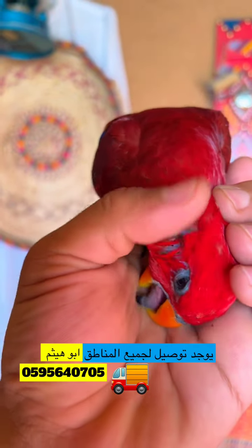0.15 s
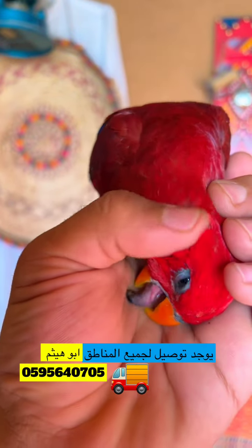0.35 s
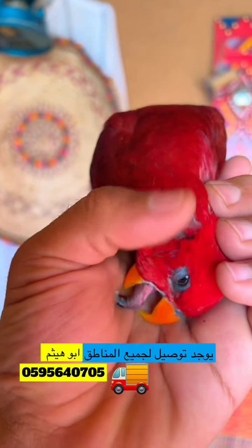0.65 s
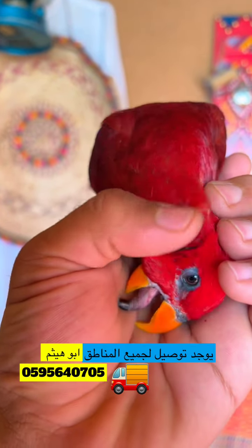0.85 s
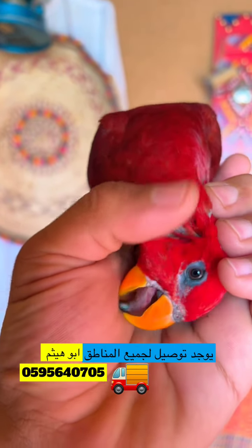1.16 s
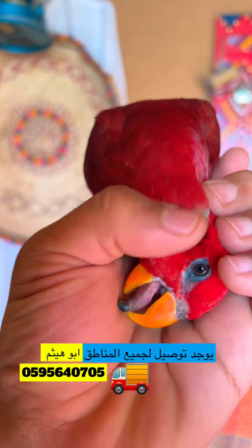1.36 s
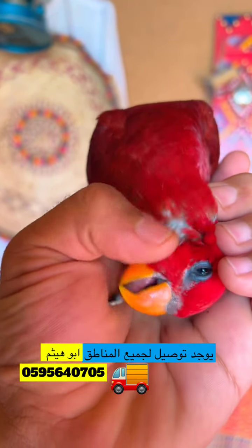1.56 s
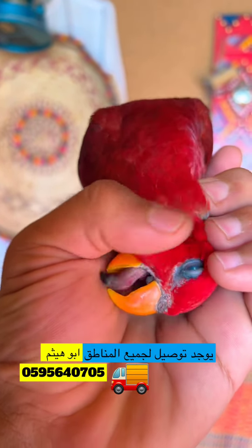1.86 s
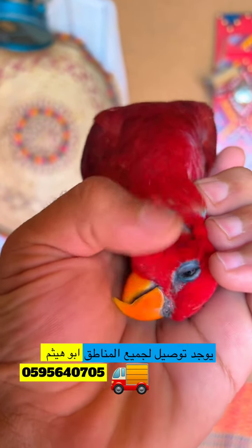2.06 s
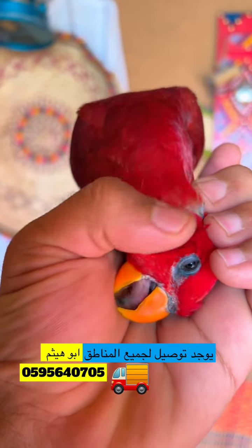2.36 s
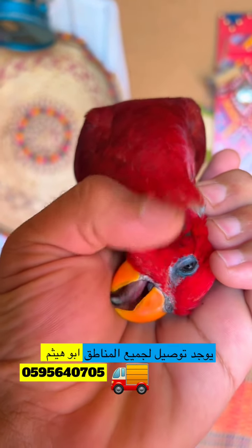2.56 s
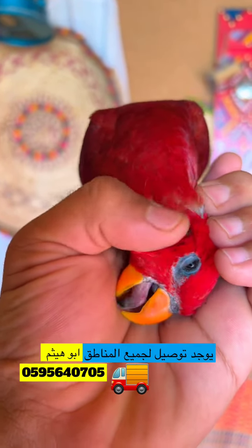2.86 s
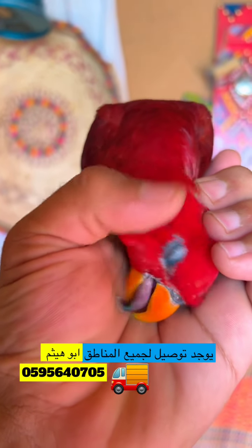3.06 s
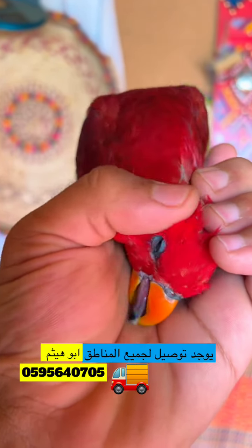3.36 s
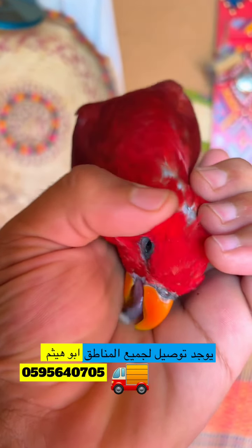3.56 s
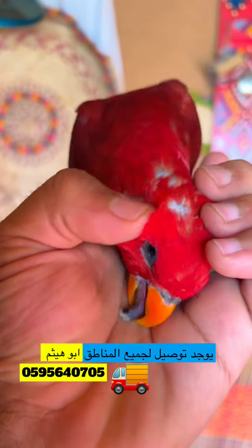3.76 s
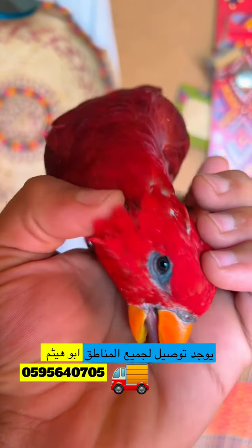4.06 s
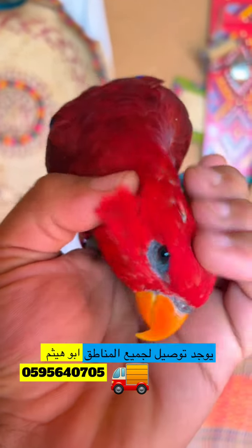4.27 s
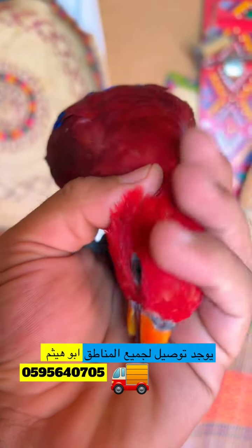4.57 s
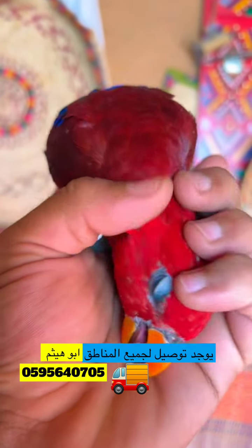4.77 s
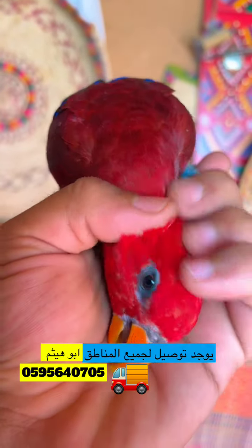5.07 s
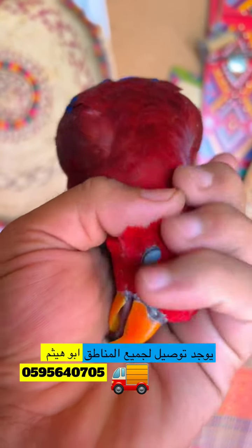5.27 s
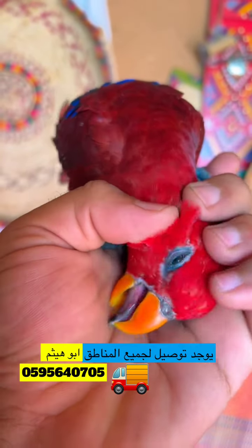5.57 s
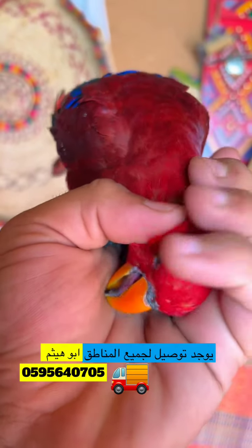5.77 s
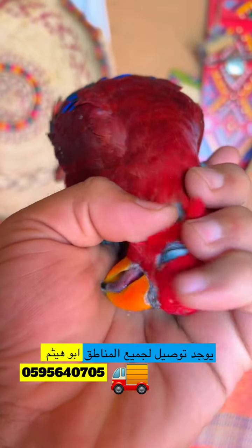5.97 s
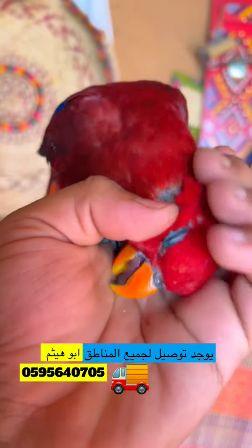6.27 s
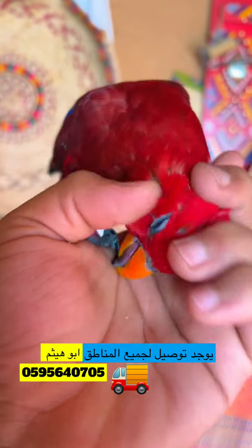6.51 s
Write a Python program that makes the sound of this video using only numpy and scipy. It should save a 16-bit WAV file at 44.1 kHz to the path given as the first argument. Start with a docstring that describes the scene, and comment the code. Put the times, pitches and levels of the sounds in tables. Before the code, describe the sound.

Close, raspy parrot squawks and drawn-out screeches burst out indoors, broken by small whimpers and a brief lull with tiny dry ticks.

```python
"""A small room with an appliance humming: a lory held in a hand squawks in quick runs, close to a phone.
Each squawk is one push of breath: the syrinx scoops up, mostly to about 2 kHz, then sags and splits
into subharmonics and rasp. Soft whimpers come between, and three drawn-out screams in the middle,
the first clearing to a high whistle. Low moans waver under the calls.
Fingers rub the feathers in short dull scuffs of noise, and four dry ticks fall in the late lull."""
import sys
import numpy as np
from scipy import signal
from scipy.fft import rfft, irfft
from scipy.io import wavfile
from scipy.ndimage import uniform_filter1d

SR = 44100
rng = np.random.default_rng(int(sys.argv[2]) if len(sys.argv) > 2 else 0)


def output_pcm(signal):
    """Save a mono or channel-first signal as 16-bit PCM at the path in sys.argv[1].

    Samples are clipped to [-1, 1] before scaling.
    """
    pcm = np.clip(np.atleast_2d(signal).T, -1, 1) * 32767
    wavfile.write(sys.argv[1], SR, np.round(pcm).astype(np.int16))


N = 292824
TIME = np.arange(N) / SR


def undb(db):
    """Decibels to gain."""
    return 10 ** (np.asarray(db) / 20)


def unit(x):
    """Scale to rms 1."""
    return x / np.sqrt(np.mean(x ** 2))


def steady(x, size=1300):
    """Scale to rms 1 over about every 30 ms, keeping the faster flutter."""
    return x / np.sqrt(np.abs(uniform_filter1d(x ** 2, size)) + 1e-12)


def curves(rows):
    """Each column of a table joined by straight lines in time."""
    s, *columns = np.transpose(rows)
    return [np.interp(TIME, s, c) for c in columns]


def colour(x, points):
    """Filter by a spectrum of (Hz, dB) points, joined along log frequency."""
    hz, db = np.transpose(points)
    bins = np.maximum(np.fft.rfftfreq(N, 1 / SR), 1)
    gain = undb(np.interp(np.log(bins), np.log(hz), db))
    return irfft(rfft(x) * gain, N)


def below(x, hz):
    """The part of x under hz, without delay."""
    return signal.sosfiltfilt(signal.butter(6, hz, fs=SR, output="sos"), x)


def noise():
    """White noise."""
    return rng.standard_normal(N)


def wobble(hz):
    """Random motion mostly slower than hz, spread 1."""
    slowing = 1 + (np.fft.rfftfreq(N, 1 / SR) / hz) ** 4
    return unit(irfft(rfft(noise()) / slowing, N))


def swell(s, length):
    """A smooth bump around time s."""
    return np.exp(-((TIME - s) / length) ** 2)


def appliance(rumble_db=0):
    """Low rumble and faint air, with slightly wavering hum lines."""
    # spectrum of the room tone: frequency_hz, relative_density_db
    room_tone = [(15, -17), (25, -3.5), (76, 0), (161, -15), (249, -15), (516, -18), (887, -25),
                 (1190, -28), (2280, -35.5), (3620, -46), (7920, -49), (16000, -59.5)]
    # the appliance's steady lines: frequency_hz, rms_level_db
    hum_lines = [(58, -43), (119, -60), (538, -57)]
    room_tone_db = -39
    hum = np.zeros(N)
    for hz, db in hum_lines:
        hum += undb(db) * np.sqrt(2) * np.sin(2 * np.pi * hz * TIME + 0.67 * wobble(3.4))
    swaying = undb(.8 * wobble(4))
    return hum + undb(room_tone_db + rumble_db) * unit(colour(noise(), room_tone)) * swaying


def room(x, wet_db=-10, early_db=-9):
    """A few near surfaces answer first, then a short tail whose treble dies sooner."""
    t60_low_s, t60_high_s, gap_s = .42, .3, .005
    t, hiss = TIME[:SR], rng.standard_normal(SR)
    low = below(hiss, 6000)
    tail = low * undb(-60 * t / t60_low_s) + .8 * (hiss - low) * undb(-60 * t / t60_high_s)
    tail = tail * np.clip(t / gap_s - 1, 0, 1)
    response = undb(wet_db) * tail / np.linalg.norm(tail)
    lags = rng.integers(40, 400, size=6)  # in samples, about 1 to 9 ms
    response[lags] += undb(early_db) * rng.choice([-1, 1], len(lags)) / np.sqrt(len(lags))
    return x + signal.fftconvolve(x, response)[:N]


def ticks(decay_s=0.0057, tick_db=0):
    """Tiny bright snaps of decaying noise, as of a beak tip or claw."""
    # dry ticks: start_s, onset_level_db
    tick_times = [(5.4752, -36.5), (5.654, -36.5), (5.8634, -41), (5.9853, -47.5)]
    # spectrum of a tick: frequency_hz, relative_level_db
    tick_colour = [(1000, -30), (4000, -24), (7000, -8), (10500, 9), (13000, 12), (16000, 8.5)]
    snap = np.zeros(N)
    for s, db in tick_times:
        snap += undb(db) * (TIME >= s) * np.exp(-np.abs(TIME - s) / decay_s)
    return undb(tick_db) * snap * unit(colour(noise(), tick_colour))


def fingers(grip_db=4.5, spread=1.534):
    """Short, dull, uneven scuffs as the grip shifts: narrow bands of noise under smooth swells."""
    # fingers on feathers: middle_s, half_length_s, level_db, centre_hz
    rubs = [(0.28, 0.092, -42, 835), (0.481, 0.079, -37.5, 282), (0.575, 0.026, -41, 368),
            (3.41, 0.12, -48.5, 402.7), (3.903, 0.031, -30, 434), (4.25, 0.082, -40.5, 261),
            (4.291, 0.065, -43.5, 819), (5.32, 0.019, -30.5, 402), (6.053, 0.032, -36.5, 422.3),
            (6.318, 0.068, -42.5, 383), (6.567, 0.085, -42, 382.5)]
    out = np.zeros(N)
    slip = noise() * undb(grip_db * wobble(70))
    ratio = max(spread, 1.1)
    for s, length, db, hz in rubs:
        band = signal.butter(2, [hz / ratio, hz * ratio], "band", fs=SR, output="sos")
        out += undb(db) * swell(s, length) * steady(signal.sosfilt(band, slip))
    return out


def moans(waver=0.057):
    """A slower vibration of the syrinx comes and goes as a wavering low tone."""
    # low moans under the calls: middle_s, half_length_s, pitch_hz, rms_level_db
    moan_rows = [(0.3, .06, 1150, -39.5), (1.58, .025, 1247, -37.5), (2.626, 0.039, 648, -37),
                 (2.7, 0.027, 960, -32), (2.893, 0.019, 932, -35.5), (3.123, 0.027, 969, -34.5),
                 (4.071, 0.04, 933, -38), (6.29, 0.039, 1105, -40), (6.477, 0.034, 1164, -36.5)]
    clock = np.cumsum(1 + waver * wobble(90)) / SR
    out = np.zeros(N)
    for s, length, hz, db in moan_rows:
        out += undb(db) * swell(s, length) * np.sqrt(2) * np.sin(2 * np.pi * hz * clock)
    return out


def gate(t, start, end, attack_s=0.0047):
    """The airway opens quickly at start and shuts half as fast at end."""
    opening = np.clip((t - start) / attack_s + .5, 0, 1)
    return opening * np.clip((end - t) / (2 * attack_s) + .5, 0, 1)


def whimper(t, start, length, db, first_hz, last_hz):
    """A soft, nearly clean falling note through an almost shut beak."""
    rough, split, beak_db = .32, .15, -18
    pitch_hz = np.interp(t, [start, start + length], [first_hz, last_hz])
    return undb(db) * gate(t, start, start + length), pitch_hz, rough, split, beak_db


def scream(t, rows):
    """A long breath on which the syrinx wanders between tone and rasp."""
    s, *columns = np.transpose(rows)
    db, *state = [np.interp(t, s, c) for c in columns]
    return undb(db) * gate(t, s[0], s[-1]), *state


def squawk(t, start, attack, hold, release, db, pitch_hz, rough, split, beak_db):
    """One push of breath: the note scoops up out of rasp, then sags and splits as the beak closes."""
    build_s, build_db = .1, 18.5  # the breath builds about this much in this time; short attacks start fuller
    fade_db = 18  # fall over the release
    settle_share = .3  # the syrinx settles on its note in this share of the attack
    scoop, sag_per_s = .1, .58  # shares of the pitch: flat at the start, and sinking each second
    start_rough, end_rough = .7, .2  # shares of the way to pure rasp, where the breath is weak
    split_per_s = 5.5  # subharmonics grow as the squawk goes on
    beak_close_db_per_s = 5
    # a squawk with an abrupt attack catches once just before it sounds
    abrupt_s, catch_lead_s, catch_s, catch_db = .045, 0.01, .004, -8.5

    since_peak = t - start - attack
    since_middle = since_peak - hold / 2
    slack = np.clip(-since_peak / build_s, 0, 2) ** 1.15
    spent = np.clip((since_peak - hold) / release, 0, 1)
    unsettled = np.exp(-np.maximum(t - start, 0) / (settle_share * attack))
    gain = undb(-build_db * slack - fade_db * spent) * gate(t, start, start + attack + hold + release)
    catch = (attack < abrupt_s) * undb(catch_db) * np.exp(-((t - start + catch_lead_s) / catch_s) ** 2)
    return (undb(db) * (gain + catch),
            pitch_hz * (1 - scoop * unsettled - sag_per_s * since_middle),
            rough + (1 - rough) * (start_rough * unsettled + end_rough * spent),
            split + split_per_s * since_middle,
            beak_db - beak_close_db_per_s * since_middle)


def controls():
    """Loudness, pitch, roughness, subharmonics and beak; the strongest call of the moment has the syrinx."""
    # squawks, as they stand at the hold: start_s, attack_s, hold_s, release_s, level_db, pitch_hz,
    # roughness (0-1), subharmonic_strength (0-1), treble_share_db (about 5 to 9 kHz)
    squawk_rows = [ (0.057, .11, 0.01, 0.095, -23, 1920, 0.73, 0.74, -11),
                   (0.248, 0.069, 0.025, 0.054, -19, 3850, 0.84, .9, -5.5),
                   (0.418, 0.057, 0.02, 0.19, -18.5, 1930, .4, 0.58, -8.5),
                   (0.571, 0.057, 0.032, 0.036, -17, 1810, 0.52, 0.49, -8.5),
                   (0.872, .115, .035, 0.0655, -13.5, 1902, 0.5, 0.34, -8.5),
                   (1.151, 0.077, 0.054, .06, -15.5, 1898, .34, 0.34, -8.5),
                   (1.485, 0.063, 0.049, 0.063, -15, 1975, .42, 0.46, -8),
                   (1.812, .055, .04, 0.05, -17, 1929, 0.29, 0.17, -12),
                   (2.158, 0.048, 0.045, 0.047, -39.5, 2150, 0.71, 0.26, -16.5),
                   (2.46, .145, .015, 0.053, -22, 1530, 0.91, 0.9, -11.5),
                   (2.663, 0.044, .07, .02, -31.5, 2050, 0.76, 0.77, -12),
                   (4.273, 0.046, 0.056, .03, -43.5, 2210, 0.71, 0.78, -14),
                   (4.501, .028, 0.1, 0.061, -15.5, 1970, .5, 0.32, -4.5),
                   (4.76, 0.042, .1, 0.056, -15.5, 2055, .53, 0.46, -3.5),
                   (5.077, 0.036, 0.11, .11, -15.5, 2005, 0.58, 0.39, -4),
                   (6.002, 0.07, 0.045, 0.051, -37.5, 1930, 0.8, 0.46, -15),
                   (6.226, .07, 0.019, 0.085, -30.5, 1133, 0.7, 0.05, -16),
                   (6.437, 0.01, 0.054, 0.031, -18.5, 3524, 0.7, 0.72, -2.5),
                   (6.551, 0.023, 0.042, 0.036, -35, 2240, 0.8, 0.75, -10.5)]
    # whimpers: start_s, length_s, level_db, first_pitch_hz, last_pitch_hz
    whimper_rows = [(0.775, 0.071, -45.5, 2185, 2020), (2.438, .055, -40.5, 2046, 2040),
                    (3.529, 0.076, -35, 2371, 2330), (4.983, 0.089, -29.5, 2108, 1660),
                    (5.706, 0.043, -47.5, 2050, 2005)]
    # one curve per scream: time_s, level_db, pitch_hz, roughness (clipped to 0-1),
    # subharmonic_strength (0-1), treble_share_db (about 5 to 9 kHz)
    scream_curves = [
        [(2.775, -23.5, 3283, 0, 0.28, -21), (2.803, -22, 3336, 0.93, 0.98, -4.5),
         (2.83, -20.5, 3020, 0.79, 1, -7), (2.93, -19, 3070, 0.83, 1, -5.5),
         (2.99, -19, 3704, 0.51, 0.07, -14.5), (3.05, -16, 3570, 0.13, .1, -12.5),
         (3.08, -24.5, 3506, 0.07, 0.12, -31)],
        [(3.08, -23, 1970, .68, 0, -10), (3.15, -16.5, 2157, 0.72, 0.68, -10),
         (3.177, -13.5, 1898, 0.62, 0.42, -10.5), (3.23, -21.5, 1748, 0.94, 0.98, -8),
         (3.3, -21.5, 1248, .93, .45, -7), (3.4, -20.5, 1243, 0.95, .25, -9.5),
         (3.5, -37, 1204, .87, .05, -5.5)],
        [(3.585, -34, 1356, .92, 1, -8.5), (3.71, -16.5, 2010, 0.83, 0.51, -8.5),
         (3.78, -20, 2114, 0.76, 0.36, -8), (3.865, -15, 2157, 0.49, 0.38, -7),
         (3.905, -21.5, 1864, 0.84, 0.2, -11), (3.995, -18.5, 2008, 0.55, .3, -7),
         (4.03, -26.5, 1867, 0.9, 0.84, -10.5), (4.22, -40, 1752, 1.13, 0.96, -7)],
    ]
    # brief loud peaks within a call, as the note crosses a throat resonance:
    # middle_s, half_length_s, level_db
    peaks = [(0.454, 0.003, -20), (0.476, 0.0037, -14), (3.046, .004, -15), (3.171, 0.0039, -21),
             (4.213, 0.011, -38.5), (6.465, 0.0047, -19)]
    t = TIME[::16]  # calls move slowly enough for a coarser clock
    calls = [squawk(t, *row) for row in squawk_rows]
    calls += [whimper(t, *row) for row in whimper_rows]
    calls += [scream(t, rows) for rows in scream_curves]
    calls = np.array([np.broadcast_arrays(*call) for call in calls])
    strongest = calls[:, 0].argmax(axis=0)
    state = calls[strongest, :, np.arange(len(t))]
    loudness = np.interp(TIME, t, state[:, 0])
    for s, length, db in peaks:
        loudness += undb(db) * swell(s, length)
    # across silences the other controls glide from one call to the next
    sounding = state[:, 0] > 1e-5
    return loudness, *curves(np.column_stack([t, state[:, 1:]])[sounding])


def rasp(phase, count=14):
    """Chaotic puffs, one a cycle, whose energy shifts restlessly between neighbouring bands."""
    # spectrum of the rasp: frequency_hz, relative_density_db
    rasp_colour = [(410, -31), (700, -8.5), (1020, -8), (1280, -3), (1380, -1), (2220, -3), (2530, 4.5),
                   (3790, -3.5), (7200, -3), (8880, -22.5), (11700, -17), (16000, -43)]
    puffs = colour(noise() * (1 + 0.59 * np.cos(phase)), rasp_colour)
    out = np.zeros(N)
    for edge_hz in np.geomspace(1100, 12000, count):
        band = below(puffs, edge_hz)
        puffs = puffs - band
        out += band * undb(3.4 * wobble(22) + 2.0 * wobble(110))
    return unit(out + puffs)


def syrinx(pitch_hz, rough, split, flutter):
    """Membranes vibrate in a stack of harmonics; flutter and strain widen each into a band."""
    # under strain the note keeps dropping for an instant, which smears each harmonic downward
    drops = np.minimum(wobble(200) ** 2, 2) - .7
    bend = rough * (.06 * np.minimum(rough, .6) * flutter - .05 * drops + .025 * rough * wobble(45))
    hz = pitch_hz * (1 + bend)
    phase = 2 * np.pi * np.cumsum(hz) / SR
    tone = np.zeros(N)
    for k in range(1, 12):
        # upper harmonics slip further out of step, so their bands are broader
        slip = 1.3 * rough ** 1.5 * min(k, 4) * wobble(170)
        tone += np.cos(k * phase + slip) * (k * hz < 18000) * undb(2.2 * wobble(120))
    # cycles alternate loosely: in pairs in most calls, in threes in a high screech
    group = np.where(pitch_hz > 2800, 3, 2)
    slow_phase = phase / group + 1.8 * rough * wobble(200)
    alternation = np.cos(slow_phase) + (group - 2) * np.cos(2 * slow_phase + 1) / 2
    return tone * (1 + 1.2 * split ** 2 * alternation), phase


def lory(flutter_hz=75, voice_db=0, rasp_db=-2, bright_db=0, sheen_db=-16):
    """Voiced tone and chaotic rasp share the breath, throb together and brighten as the beak opens."""
    # throat and beak response to the voiced tone: frequency_hz, relative_gain_db
    throat = [(600, -42), (1100, -14), (1500, -11.5), (2000, -7), (2600, -3), (3300, 1.5), (3900, -0.5),
              (4750, -1), (5800, -6.5), (6700, -9), (7600, -12.5), (8600, -19.5), (9600, -18), (12000, -20),
              (15500, -25.5)]
    loudness, pitch_hz, rough, split, beak_db = controls()
    rough, split = np.clip([rough, split], 0, 1)
    flutter = np.sin(2 * np.pi * np.cumsum(flutter_hz * (1 + 0.1113 * wobble(36.24))) / SR)
    tone, phase = syrinx(pitch_hz, rough, split, flutter)

    # only a badly strained syrinx breaks into rasp
    chaos = .8 * rough ** 3.5
    voiced = np.sqrt(1 - chaos ** 2) * steady(colour(tone, throat))
    voice = voiced + chaos * undb(rasp_db) * rasp(phase)
    throb_db = 1.7 * flutter * np.minimum(4 * rough, 1)
    voice = voice * undb(throb_db + 1.2 * wobble(400) + 1.5 * chaos * wobble(90))

    # an open beak lifts the middle treble far more than the sheen above it
    body, upto_sheen = below(voice, 4900), below(voice, 8700)
    share = np.clip(undb(beak_db + bright_db), 0, .9)
    sheen = undb(sheen_db) * share ** .4 * np.where(pitch_hz > 2800, 1.6, 1)
    low_part = np.sqrt(1 - share ** 2) * steady(body)
    treble = share * steady(upto_sheen - body)
    voice = low_part + treble + sheen * steady(voice - upto_sheen)
    return undb(voice_db) * loudness * voice


def scene():
    """Bird, hand and ticks sound in the room over its steady hum."""
    in_room = ticks() + fingers() + moans() + lory()
    return (appliance() + room(in_room))[None]


def record(dry):
    """The phone's microphone, close by, rounds the highest peaks and cuts the top."""
    top_hz = 16100
    rounded = dry / (1 + (dry / .85) ** 4) ** .25
    return signal.sosfilt(signal.ellip(10, .2, 70, top_hz, fs=SR, output="sos"), rounded)


dry = scene()
out = record(dry)
output_pcm(out)
```